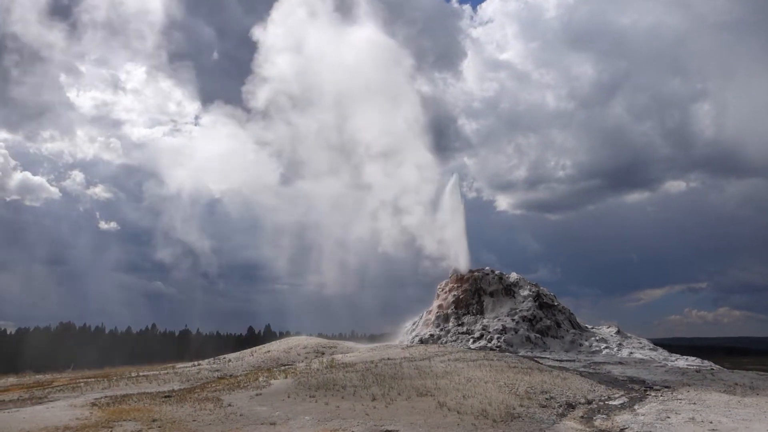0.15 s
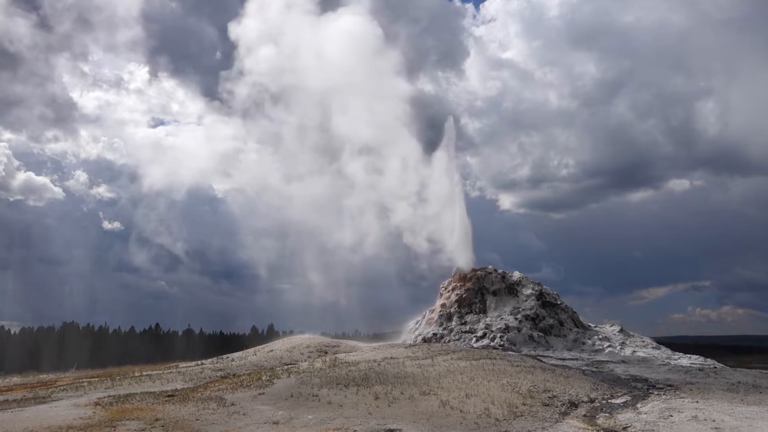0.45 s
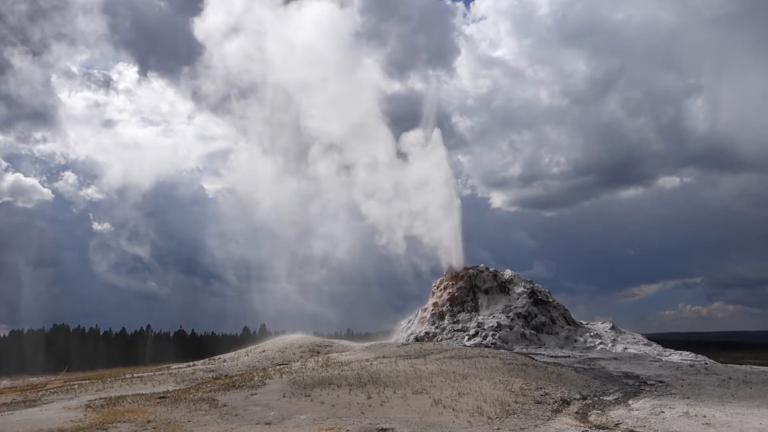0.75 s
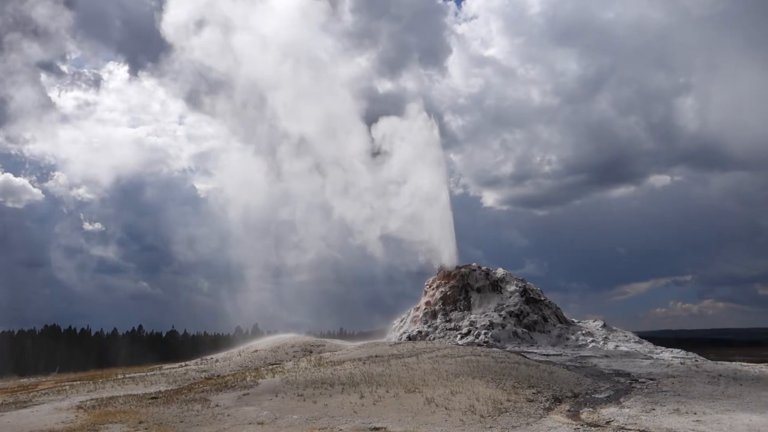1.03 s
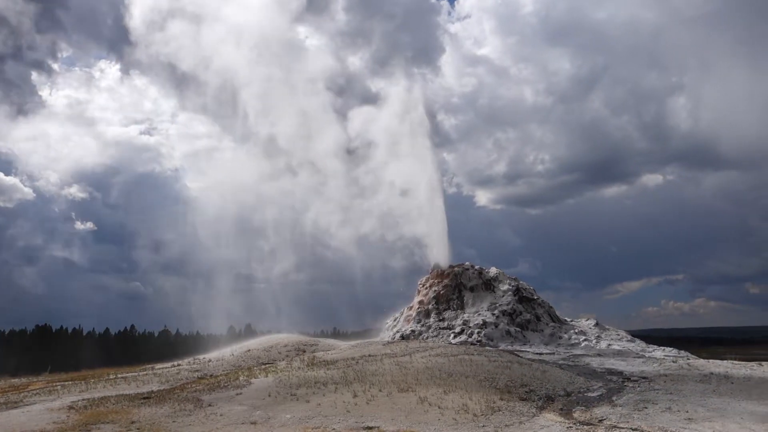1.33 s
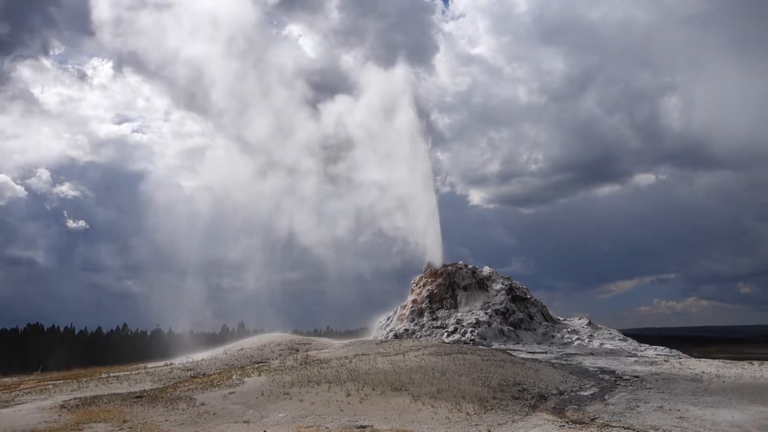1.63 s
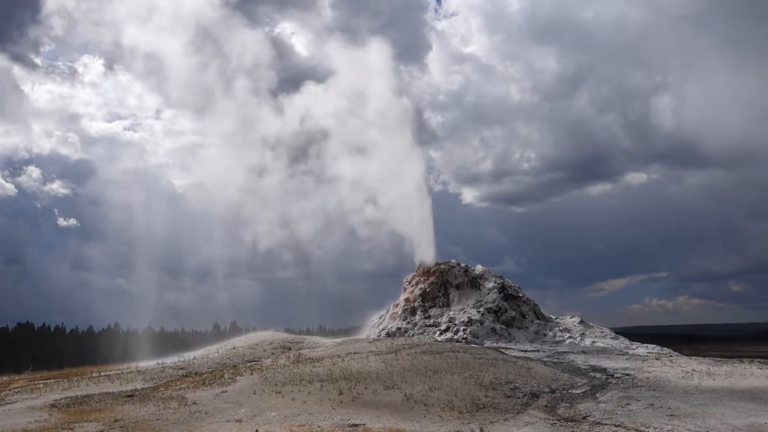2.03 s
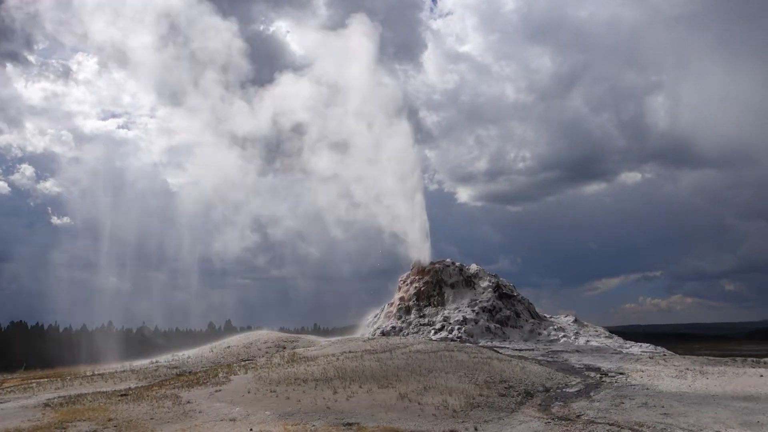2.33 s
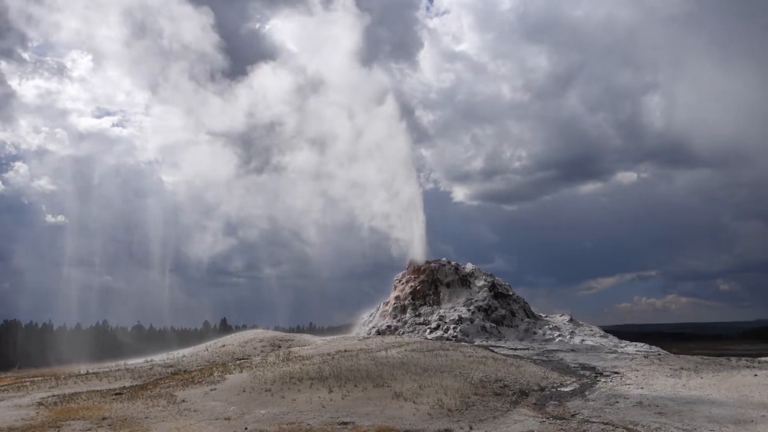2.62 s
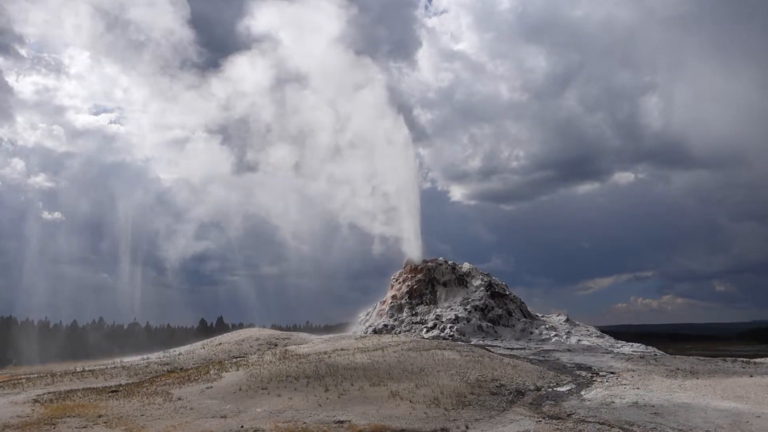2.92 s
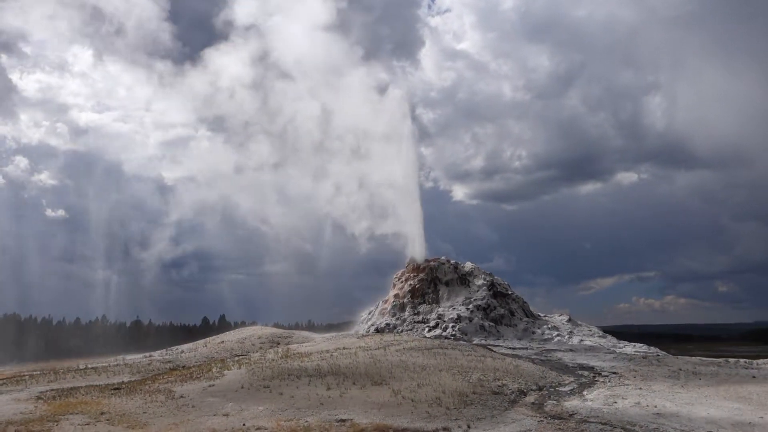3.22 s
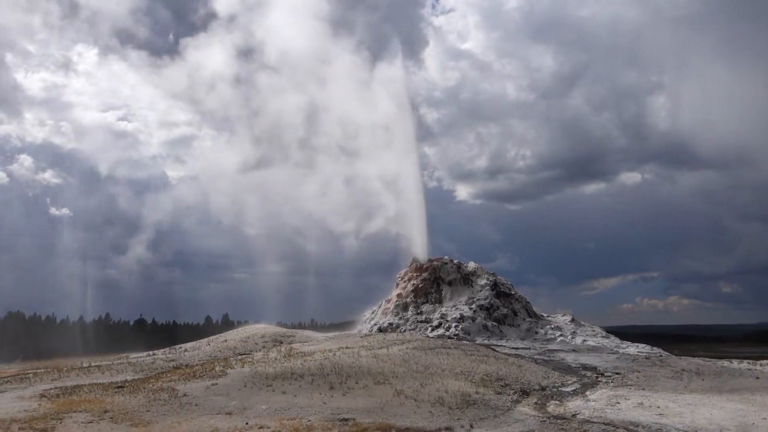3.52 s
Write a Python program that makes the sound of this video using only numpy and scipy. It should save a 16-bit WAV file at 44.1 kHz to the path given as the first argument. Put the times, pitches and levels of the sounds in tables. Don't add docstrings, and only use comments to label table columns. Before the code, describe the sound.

Heavy wind buffets an unprotected stereo camera microphone throughout, rumbling, flapping and popping in uneven gusts; beneath it a distant geyser hisses faintly, slightly to the right, in the open, with a few spray drops ticking.

```python
import sys
import numpy as np
from scipy import signal
from scipy.fft import rfft, irfft, next_fast_len
from scipy.io import wavfile
from scipy.ndimage import uniform_filter1d, minimum_filter1d, map_coordinates

SR = 44100
rng = np.random.default_rng(int(sys.argv[2]) if len(sys.argv) > 2 else 0)


def nominal_scale(level):
    x = np.asarray(level, float) / 20
    return 10 ** x


def transcribe(signal):
    frames = np.atleast_2d(signal).T
    limited = np.clip(frames, -1, 1)
    pcm = np.round(limited * 32767).astype(np.int16)
    wavfile.write(sys.argv[1], SR, pcm)


N = 161406

# time in seconds, level in dB.
JET_STRENGTH = [(0, -55.5), (.25, -59), (.55, -56.5), (.8, -59.5), (.92, -56.5), (1.05, -59.5), (1.4, -61),
                (1.6, -60), (1.85, -60), (2.1, -57.5), (2.35, -59.5), (2.62, -59.5), (2.8, -60.5),
                (3.15, -59.5), (3.35, -58), (3.52, -58), (3.66, -58.5)]
# frequency in Hz, density in dB per Hz.
HISS_SPECTRUM = [(500, -3.5), (1200, 2), (2300, 0.5), (4600, -9), (5600, -16), (8200, -18.5), (9800, -27),
                 (16000, -42)]
# frequency in Hz, left-right correlation.
JET_ALIKE = [(1200, 0.87), (3100, 0.66), (6800, 0.69), (15000, .4)]
# frequency in Hz, left-right difference in dB.
JET_SIDE = [(1200, -2), (3000, -4.5), (4800, -7), (6000, 4), (9000, 1), (14000, -17.5)]
# time in seconds, level in dB, length in seconds.
SPLASHES = [
    (2.042, -70.5, 0.014),
    (2.135, -72, 0.12),
]
# frequency in Hz, density in dB per Hz.
SPLASH_SPECTRUM = [(800, -120), (3000, -36.0), (7000, 10.5), (11000, 1.5), (16000, -17.5)]

# time in seconds, level in dB.
WIND_STRENGTH = [(0, -34.5), (.3, -32.5), (.45, -43), (.6, -39.5), (.8, -32.5), (1, -36.5), (1.3, -33),
                 (1.55, -29.5), (1.7, -38.5), (2, -38.5), (2.3, -37), (2.55, -35.5), (2.8, -33.5),
                 (3.05, -34), (3.3, -39), (3.5, -39.5), (3.58, -43.5), (3.66, -32)]
# time in seconds, change in dB, half length in seconds.
GUSTS = [(0.047, 9.5, 0.031), (0.161, 7.5, 0.0089), (0.285, -11.5, 0.017), (0.324, 7.5, 0.022),
         (0.442, -21, 0.035), (0.498, 3, 0.029), (0.61, 8.5, 0.034), (0.695, -3, 0.0054),
         (0.724, -8.5, 0.0073), (0.356, -5, 0.011), (0.104, 4, 0.0072), (1.328, -7.5, 0.0088),
         (0.776, -11, 0.038), (0.882, 1, 0.016), (0.969, 6, 0.061), (1.089, 10, 0.023), (1.255, 8.5, 0.053),
         (1.301, -4, 0.007), (1.14, -7.5, 0.02), (1.527, 3.5, 0.05), (1.748, -16.5, 0.0082),
         (1.81, 11, 0.0068), (1.924, -7.5, 0.019), (2.002, 4.5, 0.012), (2.179, -14, 0.0064),
         (2.255, 7.5, 0.03), (2.45, 9, 0.022), (2.645, 6.5, 0.024), (2.749, 6, 0.037), (2.837, 9, 0.02),
         (2.988, 6.5, 0.025), (3.176, 5.5, 0.027), (3.251, -5.5, 0.029), (3.413, 5, 0.07)]
# time in seconds, level in dB.
RUMBLE_DEPTH = [(0.0, -29.5), (0.07, -26.5), (0.46, -29.5), (0.47, -26.5), (1.7, -26), (1.8, -31.5),
                (1.84, -29.5), (2.01, -32), (2.06, -27.5), (3.09, -27), (3.11, -29), (3.49, -25),
                (3.51, -34), (3.66, -34)]
# time in seconds, change in dB, half length in seconds.
HEAVES = [(0.543, -4.5, 0.024), (0.707, -3.5, 0.028), (0.793, 4, 0.041), (0.987, -5.5, 0.033),
          (1.496, -4.5, .06), (1.644, -8, 0.031), (2.368, 5.5, 0.022), (2.748, -1.5, .03),
          (2.935, 1, 0.023), (3.16, -2.5, .03), (3.254, 4.5, 0.018), (3.432, -3.5, 0.017)]
# frequency in Hz, density in dB per Hz.
RUMBLE_SPECTRUM = [(20, -21), (35, -14.5), (60, -3.5), (100, -1.5), (170, -1), (260, -6), (450, -21.5),
                   (3000, -120)]
# frequency in Hz, density in dB per Hz.
FLAP_SPECTRUM = [(80, -23.5), (200, -1.5), (320, -0.5), (500, -5), (750, -18.5), (1100, -28), (1700, -46),
                 (6000, -120)]
# frequency in Hz, left-right correlation.
PORTS_ALIKE = [(30, 1), (70, 0.86), (130, 0.85), (290, 0.29), (640, -0.22), (1200, -0.22)]
# time in seconds, peak in dB, left-right difference in dB.
EDDIES = [(0.016, -24, 2), (0.043, -27.5, 5), (0.09, -27, 5.5), (0.148, -27.5, 4.5), (0.217, -34, -4),
          (0.301, -33.5, 3), (0.32, -31.5, -2.5), (0.386, -27, 4), (0.59, -32.5, -10.5), (0.607, -21.5, -3),
          (0.663, -26.5, -3), (0.706, -23, 3.5), (0.817, -41, -3.5), (0.85, -28, -4.5), (0.913, -34.5, -4),
          (0.94, -20.5, -1), (0.972, -24, 2), (1.054, -26, 1.5), (1.173, -32, 0.5), (1.193, -31.5, -8),
          (1.231, -26, -1.5), (1.248, -30, -5.5), (1.302, -28.5, 0), (1.344, -30, -3.5), (1.388, -29, -3.5),
          (1.463, -28, 1.0), (1.53, -26.5, 5), (1.583, -30, -0.5), (1.63, -42, -6), (1.769, -40, -8.5),
          (1.809, -30, -1.5), (1.978, -42.5, -1.5), (2.046, -36, -5.5), (2.092, -22, -1), (2.159, -35, -5),
          (2.248, -33, 0.5), (2.337, -32, -4), (2.397, -35.5, 4), (2.43, -29, 2.5), (2.564, -36.5, -3),
          (2.613, -34, 0), (2.648, -30.5, -5.5), (2.685, -34.5, 6), (2.703, -27, -4), (2.754, -31, 2),
          (2.779, -37, -6.5), (2.824, -33, -0.5), (2.865, -36, -2.5), (2.941, -31, -3), (2.96, -29, 4.5),
          (3.092, -34.5, -3), (3.148, -35.5, 1), (3.166, -30, -9), (3.199, -24.5, 2.5),
          (3.277, -34.5, -8.5), (3.302, -36, 2), (3.351, -32, -8), (3.378, -30.5, 4), (3.469, -31, -5),
          (3.637, -38, 4)]

# time in seconds, peak in dB, frequency in Hz, left-right difference in dB.
DROPS = [(.196, -50, 6000, 4), (.259, -48, 6000, 0), (2.051, -47, 11500, -3), (3.4155, -31, 7500, 0),
         (3.5478, -43, 7000, -2), (2.17, -50, 8000, 0), (3.4155, -42, 4800, 0), (3.4155, -38, 12500, 0),
         (2.043, -50, 9500, 0), (2.068, -51, 6500, 0)]
# time in seconds, peak in dB, frequency
# in Hz, left-right difference in dB.
KNOCKS = [(.215, -7, 300, 0), (.476, -11, 300, 0), (2.0925, -20, 1150, -3), (2.462, -19, 900, 0),
          (.706, -22, 1000, 3), (1.085, -24, 1100, 0), (3.2785, -29, 1600, -12), (3.2785, -38, 3200, -6)]
# time in seconds, level in dB, frequency in Hz, 60 dB decay in seconds.
PLOP = (3.572, -42, 1100, .2)
# frequency in Hz, density in dB per Hz.
FLOOR_SPECTRUM = [(2000, -8.5), (8000, -2.5), (16000, -4.5)]
# time in seconds, change in dB, length in seconds.
FLINCHES = [(0.066, -5.5, 0.021), (0.161, -2.7, 0.012), (0.189, -6, 0.017), (0.248, -1, 0.012),
            (0.417, 0, 0.041), (0.547, -0.2, 0.044), (0.722, -6, 0.014), (0.809, 0.5, 0.0077),
            (0.825, -4, 0.013), (1.017, -2, 0.089), (1.075, 2.3, 0.0049), (1.097, -6.5, 0.02),
            (1.184, -0.8, 0.013), (1.202, -1.5, 0.012), (1.29, -2.5, 0.023), (1.434, -1, 0.005),
            (1.472, -1.5, 0.011), (1.532, 1.5, 0.053), (1.617, 0.5, 0.03), (1.737, -2, 0.018),
            (1.788, -2, 0.02), (1.898, 2, 0.017), (2.006, -2.0, 0.024), (2.195, -1.5, 0.032),
            (2.329, -3.5, 0.029), (2.429, -2.5, 0.01), (2.462, -2, 0.0024), (2.492, -2.5, 0.078),
            (2.561, 1.5, 0.012), (2.653, -3, 0.048), (2.736, -5.5, 0.012), (2.845, -0.5, 0.029),
            (2.94, -0.5, 0.0092), (2.99, -4, 0.036), (3.207, 0, 0.0154), (3.352, -1.5, 0.077),
            (3.524, -0.5, 0.032)]

FIZZ_FOLLOWS = 0.6
RUMBLE_DB, RUMBLE_FOLLOWS = 1.5, 0.36
FLAP_DB, FLAP_SIDE_DB = 6.5, -2
CREST_DB, CREST_DB_PER_DB, CREST_FROM_DB, CREST_SHIFT_RATIO = -12.5, 1.81, -30.5, 1.395
EDDY_S, EDDY_DB, EDDY_HZ, EDDY_LAG_CYCLES = 0.00038, 5, 650, 0.13
TICK_CYCLES, TICK_RISE_CYCLES = 5, 0.1
KNOCK_CYCLES, KNOCK_RISE_CYCLES = 7, 0.8
SELF_NOISE_DB = -74.5
DUCK_DB_PER_DB, DUCK_FROM_DB, RELEASE_S = 0.27, -18.5, 0.019
FLINCH_DEPTH, FLINCH_WIDTH = 0.9, 0.44
CEILING_DB, HOLD_S = -9.5, 0.006


def unit(x):
    return x / np.sqrt(np.mean(x ** 2) + 1e-20)


def noise_pair():
    return rng.standard_normal((2, N))


def along(points, hz):
    f, v = np.transpose(points)
    return np.interp(np.log(hz + 1), np.log(f + 1), v)


def curve(rows):
    s, v = np.transpose(rows)
    return np.interp(np.arange(N) / SR, s, v)


def bumps(rows, width=1):
    t = np.arange(N) / SR
    return sum(db * np.exp(-((t - s) / (width * half_s)) ** 2) for s, db, half_s in rows)


def wobble(rate_hz):
    return map_coordinates(rng.standard_normal(2000), [np.arange(N) * rate_hz / SR])


def filtered(x, response):
    m = next_fast_len(N + 8192)
    return irfft(rfft(x, m) * response(np.fft.rfftfreq(m, 1 / SR)), m)[..., :N]


def paired(pair, spectrum, alike):
    def mid_side_gains(hz):
        turn = np.arccos(np.clip(along(alike, hz), -1, 1)) / 2
        return nominal_scale(along(spectrum, hz)) * [np.cos(turn), np.sin(turn)]

    mid, side = filtered(pair, mid_side_gains)
    return np.array([mid + side, mid - side])


def sides(db):
    return nominal_scale(np.array([db / 2, -db / 2]))


def splashes():
    t = np.arange(N) / SR
    swell = sum(nominal_scale(db - 6.0 * ((t - s) / length_s) ** 2) for s, db, length_s in SPLASHES)
    return swell * unit(paired(noise_pair(), SPLASH_SPECTRUM, JET_ALIKE))


def jet():
    z = signal.stft(noise_pair(), nperseg=512)[2]
    patches = rng.standard_normal(z.shape[1:])
    patches = uniform_filter1d(uniform_filter1d(patches, 12, 0), 8, 1)
    noise = signal.istft(z * nominal_scale(0.65 * unit(patches)), nperseg=512)[1][:, :N]
    spatter = nominal_scale(1.1 * wobble(300) + 0.37 * wobble(30.14) + 0.36 * wobble(6.72))
    hiss = paired(noise * spatter, HISS_SPECTRUM, JET_ALIKE)
    hiss = unit(filtered(hiss, lambda hz: sides(along(JET_SIDE, hz))))
    strength_db = curve(JET_STRENGTH)
    fizz = filtered(hiss, lambda hz: 1 / (1 + (6000 / (hz + 1)) ** 4))
    fizz_gain = nominal_scale(FIZZ_FOLLOWS * (strength_db - strength_db.mean())) - 1
    return nominal_scale(strength_db + 4.5) * (hiss + fizz_gain * fizz) + splashes()


def rumble(gust_db, lumps_db):
    follow_db = RUMBLE_FOLLOWS * (gust_db + lumps_db)
    swell_db = curve(RUMBLE_DEPTH) + bumps(HEAVES) + RUMBLE_DB + follow_db + 0.91 * wobble(6.68)
    return nominal_scale(swell_db) * unit(paired(noise_pair(), RUMBLE_SPECTRUM, PORTS_ALIKE))


def flapping(gust_db, lumps_db):
    strength_db = curve(WIND_STRENGTH) + gust_db
    drive = noise_pair()
    lumpy = unit(nominal_scale(lumps_db)) * drive
    scale = 1 / np.std(paired(lumpy, FLAP_SPECTRUM, PORTS_ALIKE))
    body = paired(nominal_scale(strength_db + FLAP_DB) * lumpy, FLAP_SPECTRUM, PORTS_ALIKE)
    crest_db = CREST_FROM_DB + CREST_DB + FLAP_DB + CREST_DB_PER_DB * (strength_db - CREST_FROM_DB)
    crest_spectrum = [(hz * CREST_SHIFT_RATIO, db) for hz, db in FLAP_SPECTRUM]
    crest_drive = unit(nominal_scale(1.44 * lumps_db)) * drive[:, ::-1]
    crest = paired(nominal_scale(crest_db) * crest_drive, crest_spectrum, PORTS_ALIKE)
    own_db = 1.42 * np.array([wobble(5.92) + wobble(37), wobble(6.245) + wobble(40)])
    return scale * (body + crest) * nominal_scale(own_db) * sides(FLAP_SIDE_DB)[:, None]


def eddy_pops():
    pops, t = np.zeros((2, N + 800)), np.arange(-400, 400) / SR
    for s, db, pan_db in EDDIES:
        lag_cycles = EDDY_LAG_CYCLES * np.sign(rng.standard_normal()) * np.array([[1], [-1]])
        phase_cycles = EDDY_HZ * t + rng.random() + lag_cycles
        puff = np.cos(2 * np.pi * phase_cycles) * np.exp(-(t / EDDY_S) ** 2)
        puff = puff / np.linalg.norm(puff, axis=1)[:, None]
        start = round(s * SR)
        pops[:, start:start + len(t)] += nominal_scale(db + EDDY_DB) * sides(1.6 * pan_db)[:, None] * puff
    return filtered(pops[:, 300:N + 300], lambda hz: 14 * nominal_scale(along(FLAP_SPECTRUM, hz / 1.46)))


def wind():
    gust_db = bumps(GUSTS)
    lumps_db = 0.9 * wobble(20) + 1.7 * wobble(60) + 3.6 * wobble(220)
    return rumble(gust_db, lumps_db) + flapping(gust_db, lumps_db) + eddy_pops()


def short_hits(rows, cycles, rise_cycles):
    out, t = np.zeros((2, N + 600)), np.arange(600) / SR
    for s, db, hz, pan_db in rows:
        rise = 1 - np.exp(-(t * hz / rise_cycles) ** 2)
        tick = nominal_scale(db - 60 * t * hz / cycles) * np.sin(2 * np.pi * hz * t) * rise
        start = round(s * SR)
        out[:, start:start + len(t)] += sides(pan_db)[:, None] * tick
    return out[:, :N]


def plop():
    s, db, hz, t60_s = PLOP
    t = (np.arange(N) / SR - s).clip(0)
    ring = nominal_scale(db - 60 * t / t60_s) * (1 - np.exp(-t / 0.006)) * np.sin(2 * np.pi * hz * t)
    return np.array([ring, np.zeros(N)])


def spray():
    ticks = short_hits(DROPS, TICK_CYCLES, TICK_RISE_CYCLES)
    return ticks + short_hits(KNOCKS, KNOCK_CYCLES, KNOCK_RISE_CYCLES) + plop()


def self_noise():
    return nominal_scale(SELF_NOISE_DB) * unit(paired(noise_pair(), FLOOR_SPECTRUM, [(8000, 0.75)]))


def scene():
    return jet() + wind() + spray() + self_noise()


def duck(dry):
    keep = np.exp(-4 / (RELEASE_S * SR))
    power4 = signal.lfilter([1 - keep], [1, -keep], np.max(dry ** 4, axis=0))
    peak = np.abs(power4) ** 0.25
    over_db = 20 * np.log10(peak + 1e-6) - DUCK_FROM_DB
    gain = nominal_scale(-DUCK_DB_PER_DB * over_db.clip(-6, None))
    gain = filtered(gain - 1, lambda hz: np.exp(-(hz / 300) ** 2)) + 1
    return dry * gain * nominal_scale(FLINCH_DEPTH * bumps(FLINCHES, FLINCH_WIDTH))


def limit(x):
    hold = round(HOLD_S * SR)
    need = np.minimum(1, nominal_scale(CEILING_DB) / (np.abs(x).max(axis=0) + 1e-9))
    need = minimum_filter1d(need, size=hold)
    return x * uniform_filter1d(uniform_filter1d(need, size=hold // 2), size=hold // 2)


def top_cut(x):
    return signal.sosfilt(signal.butter(12, 15710, fs=SR, output="sos"), x)


def record(dry):
    return top_cut(limit(duck(dry)))


dry = scene()
out = record(dry)
transcribe(out)
```